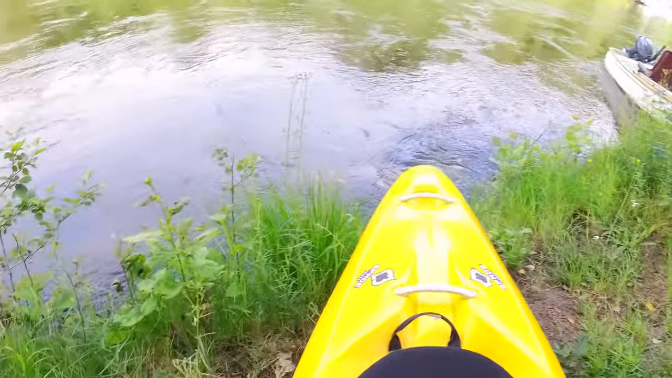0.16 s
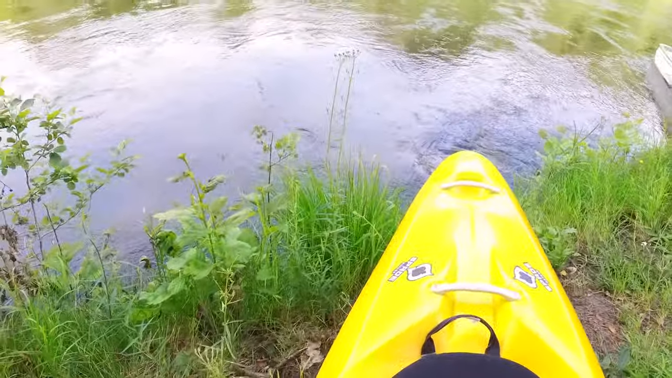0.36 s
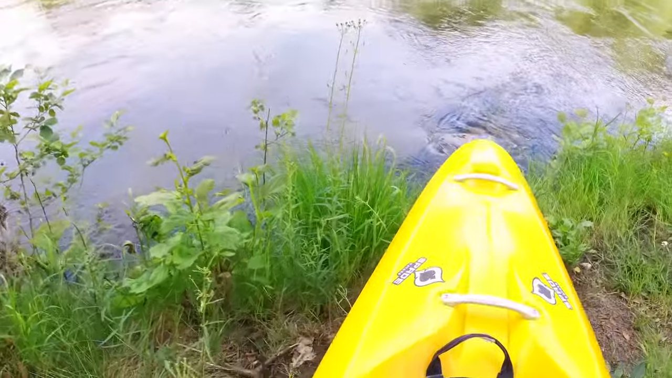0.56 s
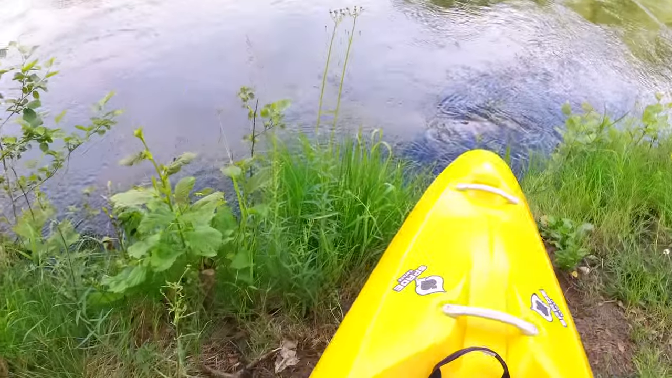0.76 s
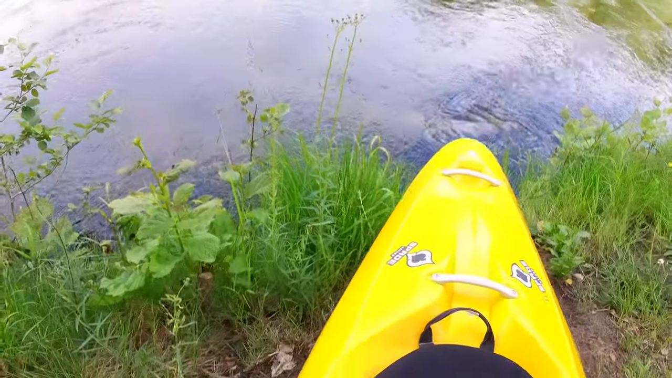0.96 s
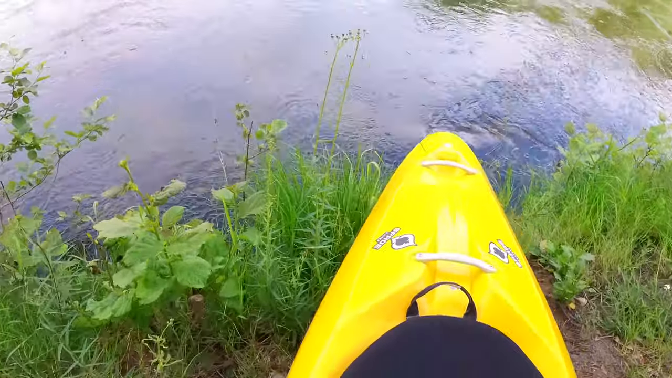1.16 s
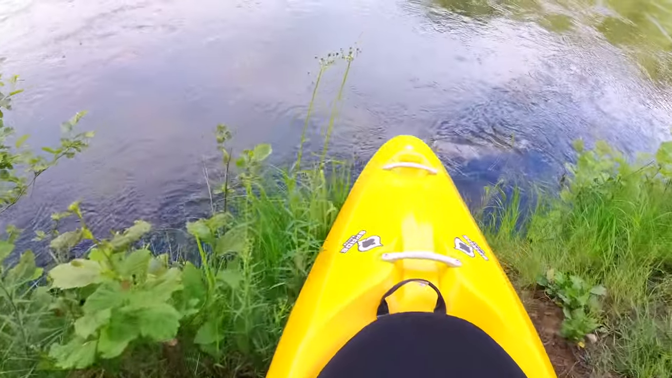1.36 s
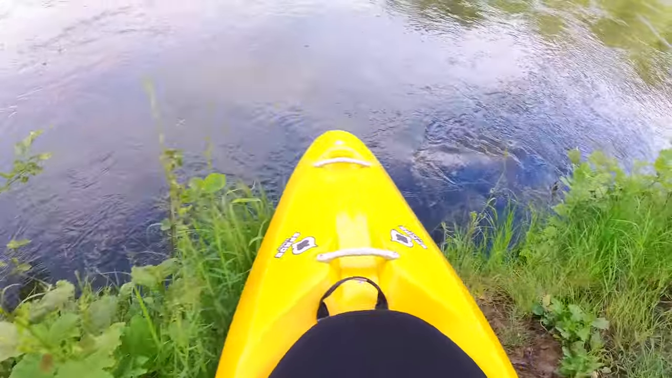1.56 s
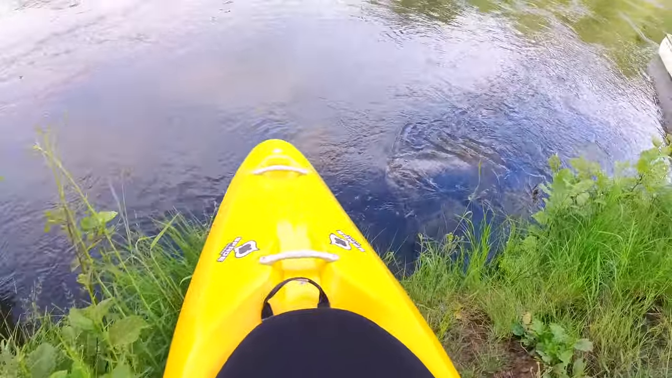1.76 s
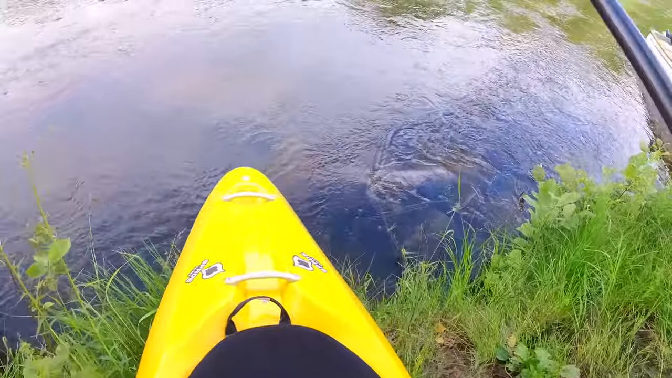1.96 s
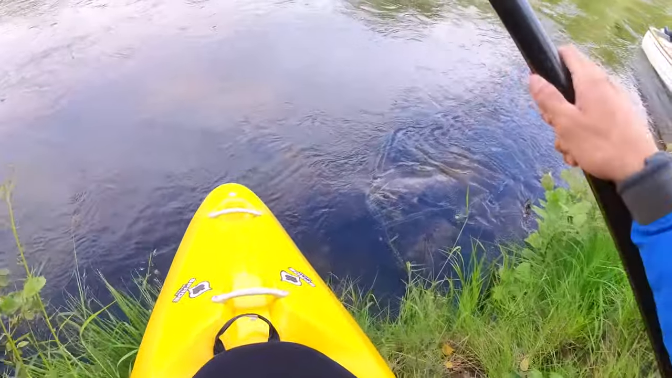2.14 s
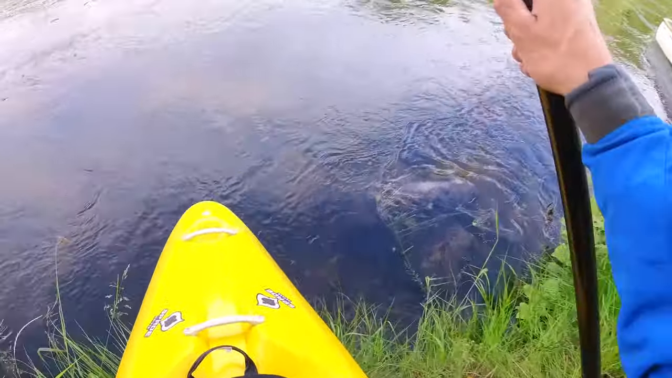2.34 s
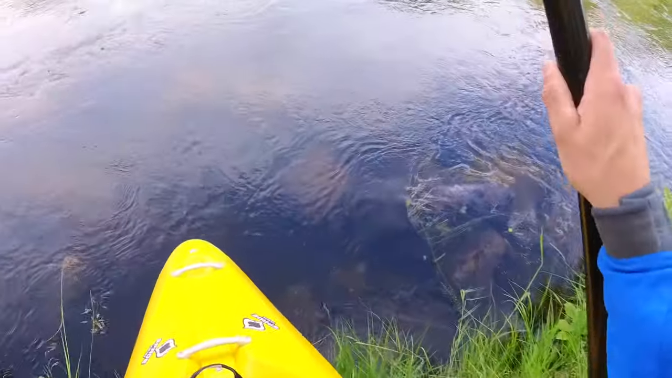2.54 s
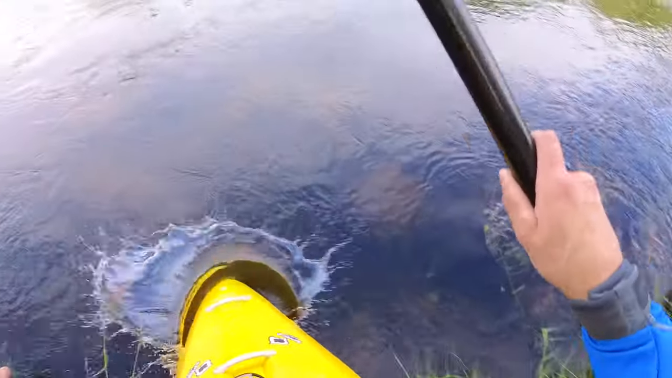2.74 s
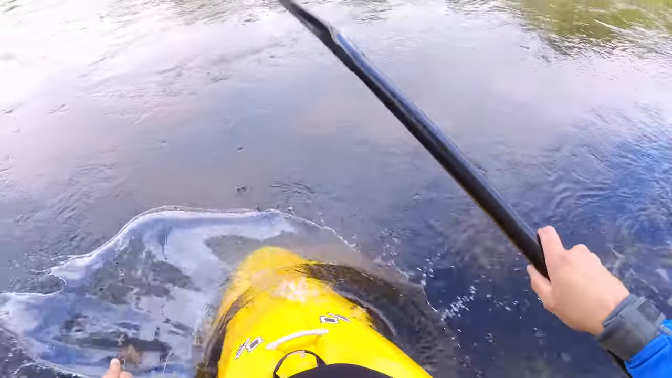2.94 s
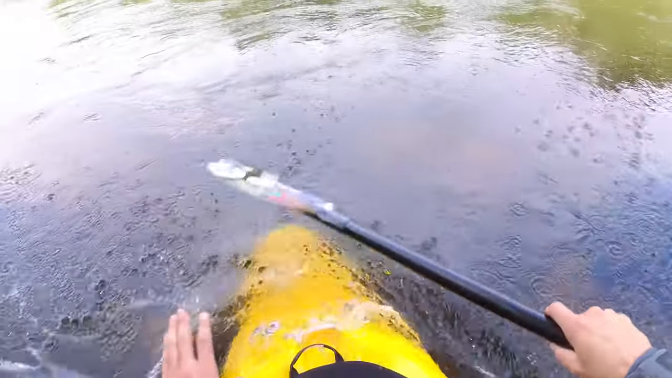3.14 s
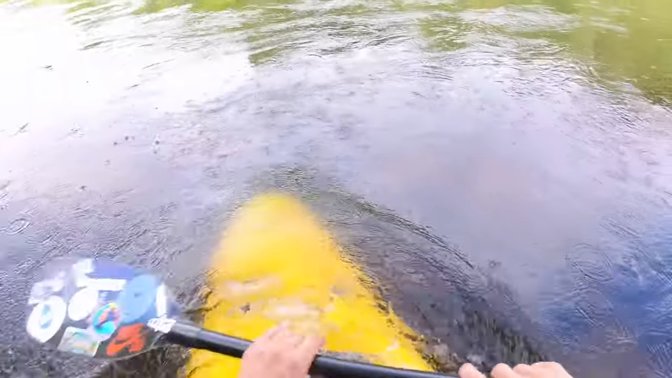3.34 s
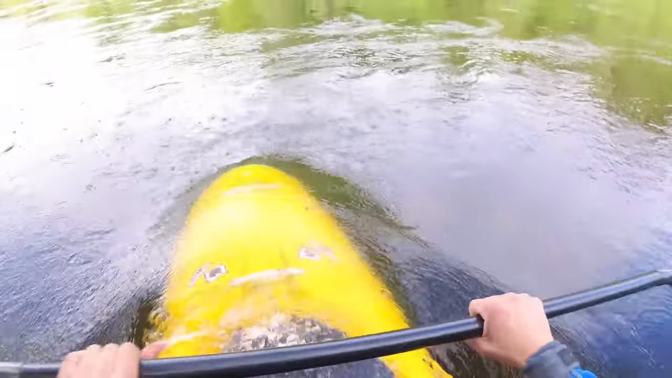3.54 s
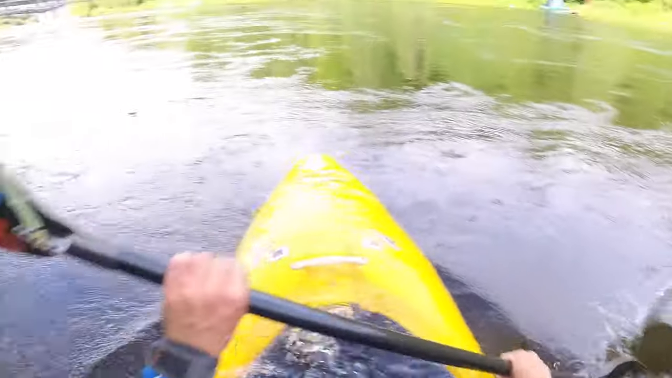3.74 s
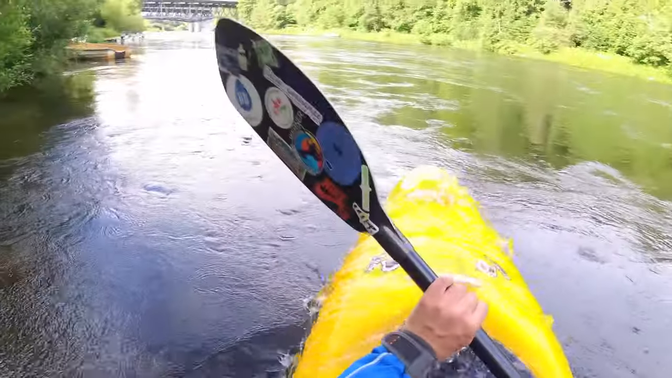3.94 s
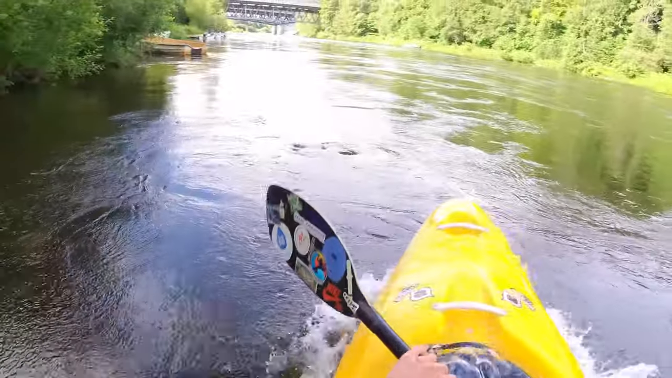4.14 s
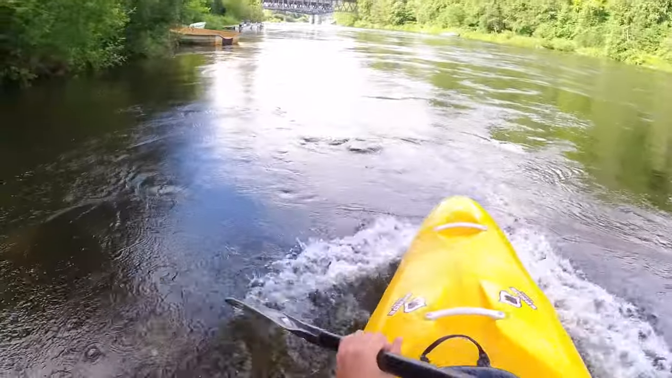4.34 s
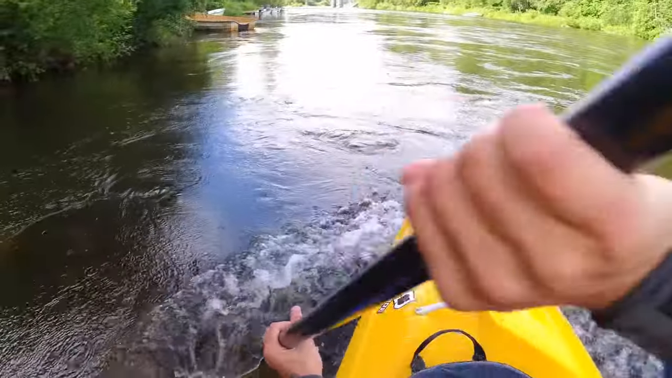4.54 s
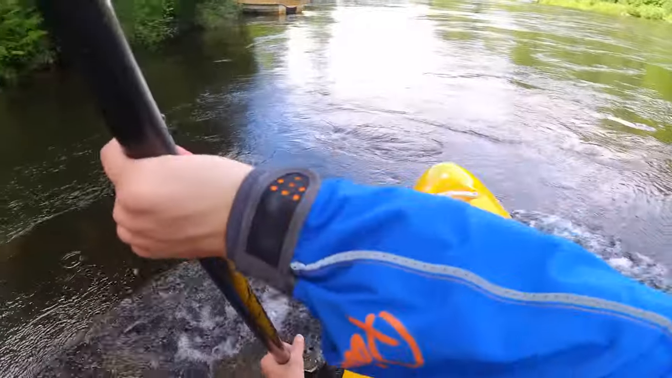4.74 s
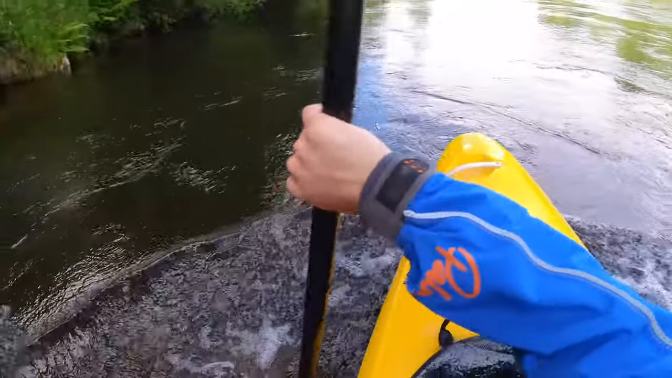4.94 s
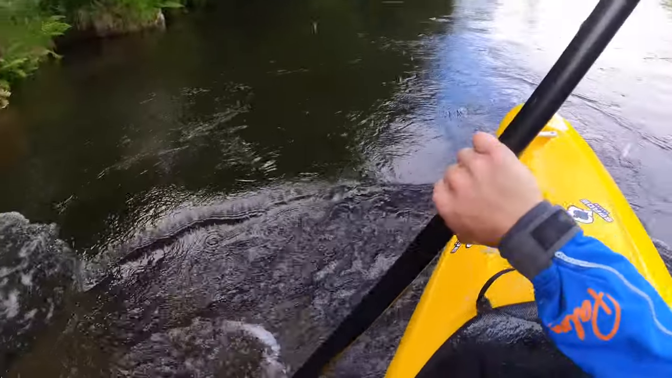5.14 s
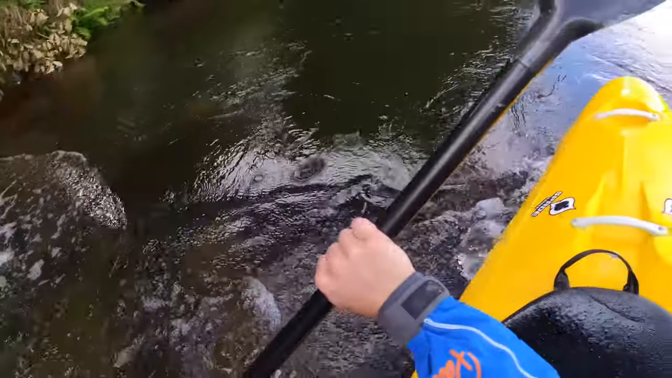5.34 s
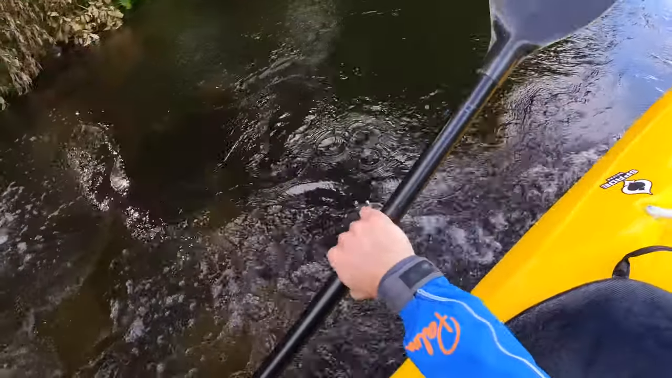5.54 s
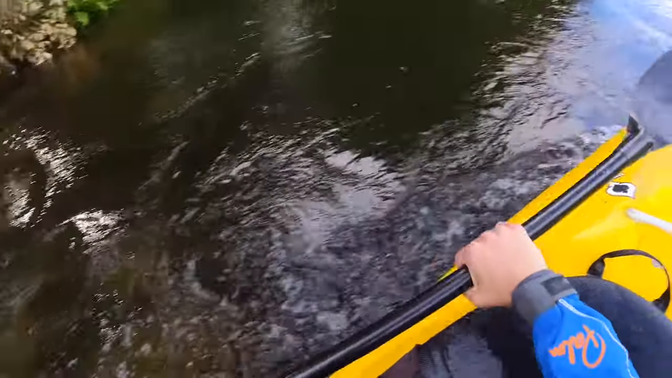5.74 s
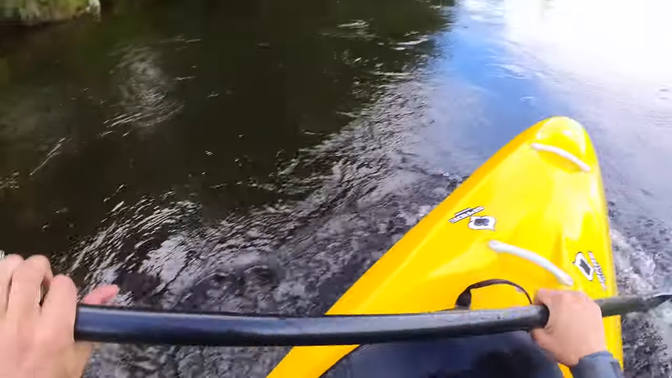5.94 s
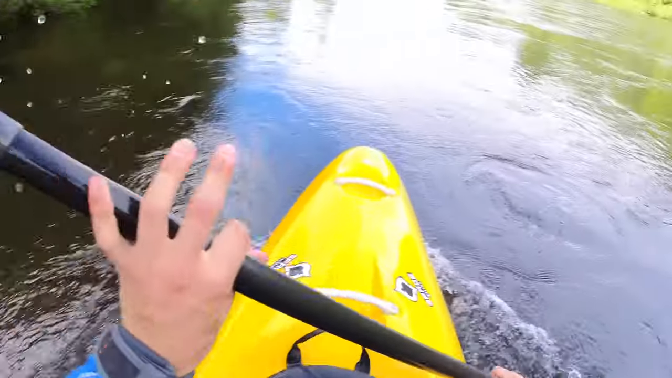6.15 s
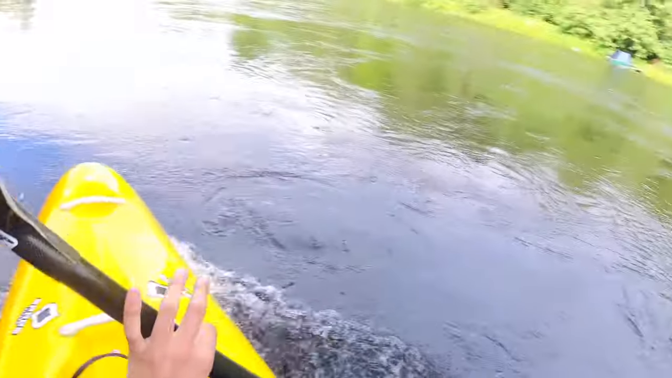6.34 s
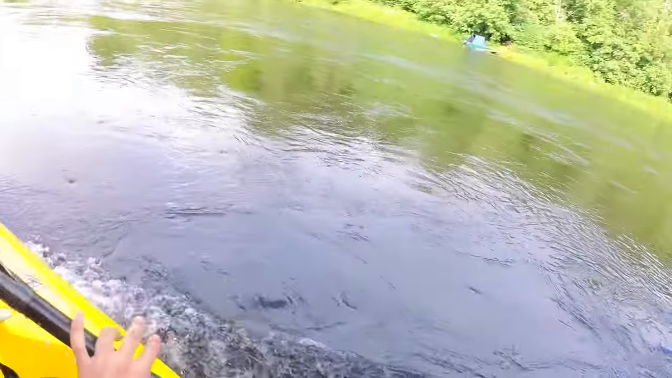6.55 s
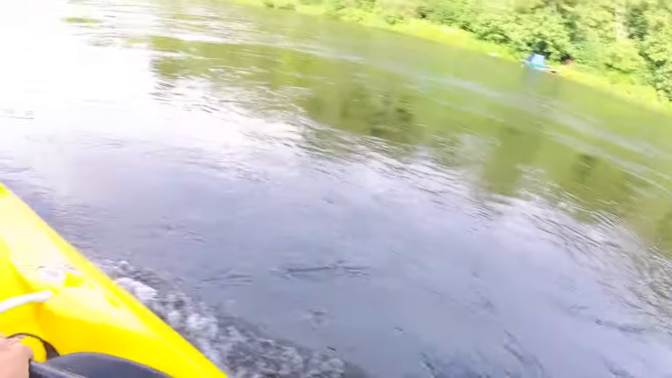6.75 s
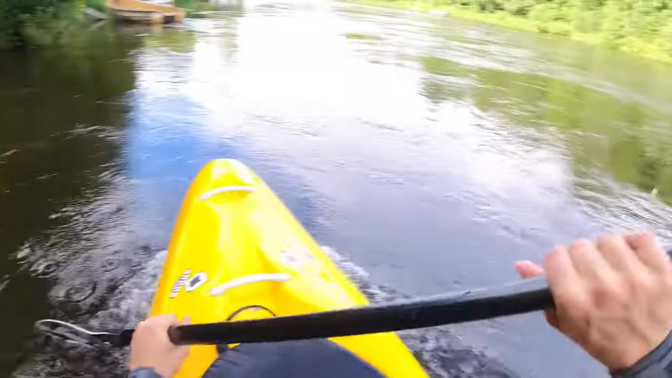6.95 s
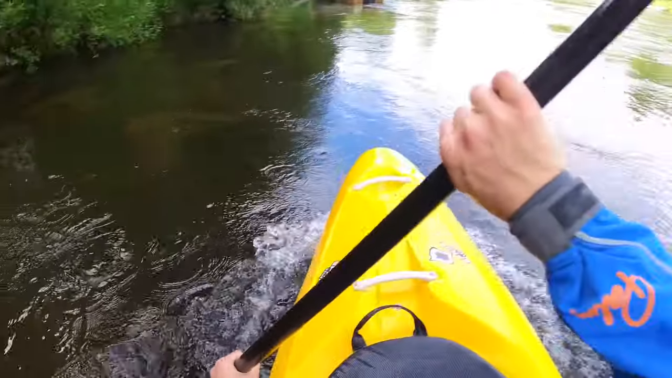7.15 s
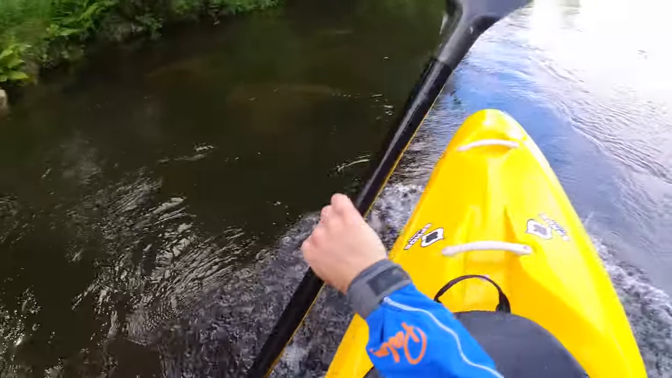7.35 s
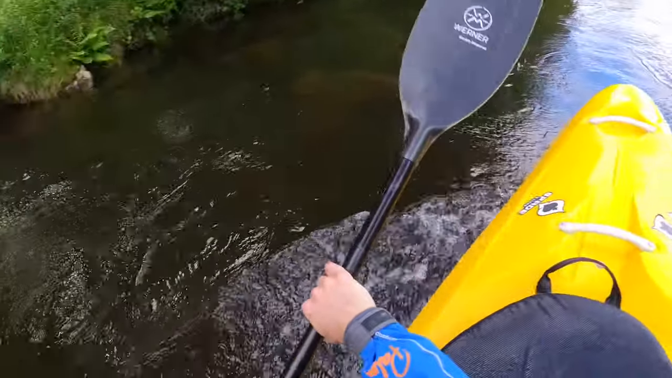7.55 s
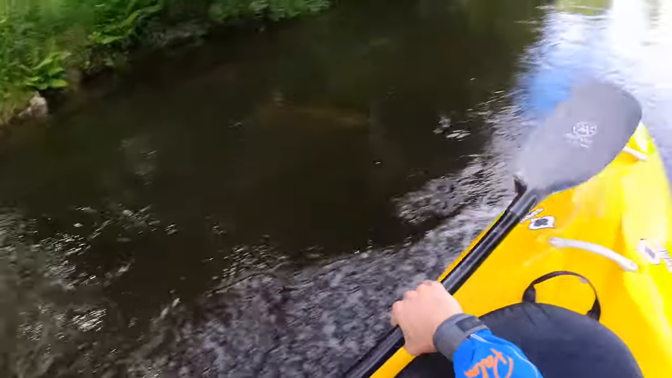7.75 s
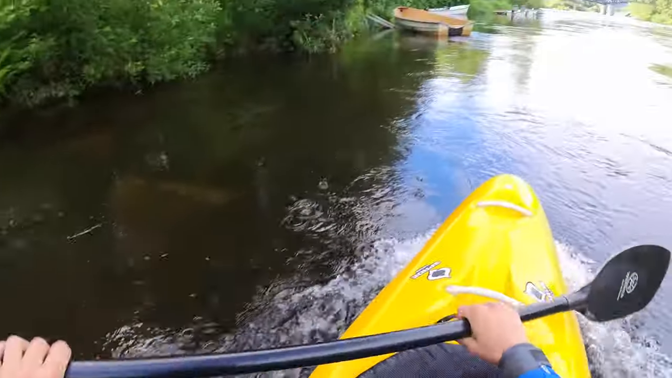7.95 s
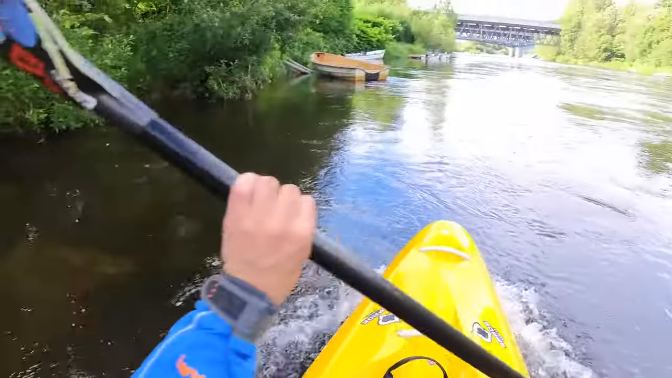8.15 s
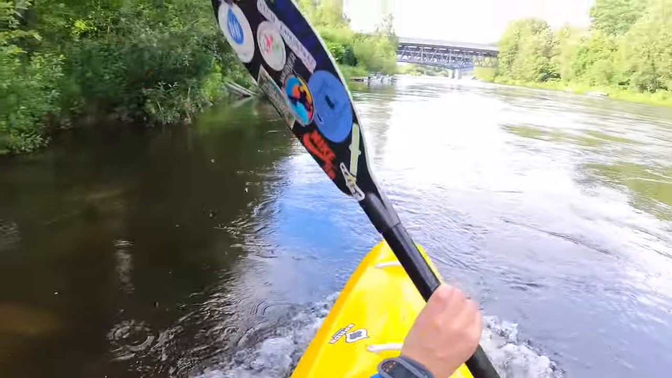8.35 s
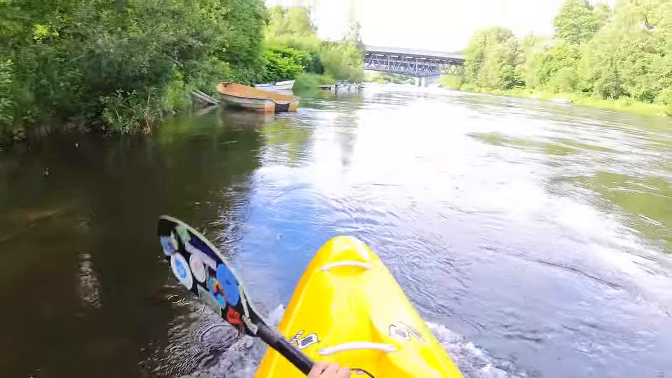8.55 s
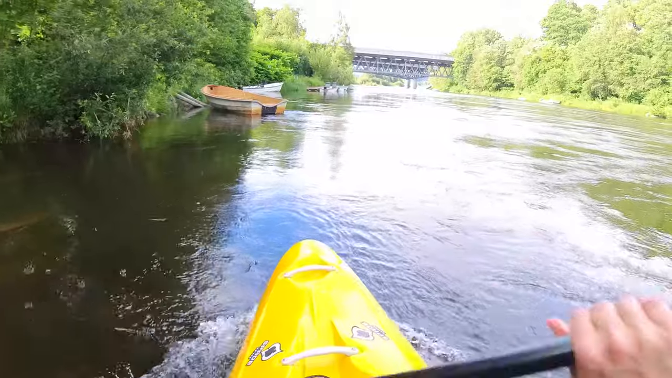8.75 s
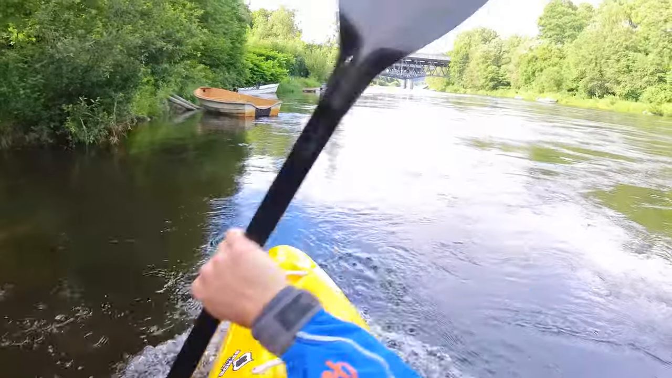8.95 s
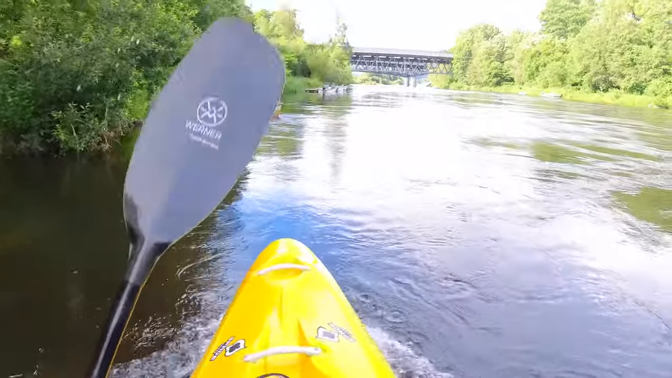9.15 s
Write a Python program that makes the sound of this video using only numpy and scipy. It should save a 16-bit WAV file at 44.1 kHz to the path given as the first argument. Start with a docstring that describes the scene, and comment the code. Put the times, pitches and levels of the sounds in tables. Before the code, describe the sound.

A hollow plastic kayak bumps and scrapes down a grassy bank, slaps into a river, then water gurgles and fizzes along it under paddle strokes.

```python
"""A plastic kayak hull booms and cracks as it bumps down a grassy bank into a river and is paddled off.
Struck modes make the hull and the paddle shaft; coloured noise makes brushing grass and sliding.
Damped sines, noise bursts and patchy noise make the water: gurgle, fizz, plops, slaps and gliding tones.
Far traffic hums and wind buffets the two microphone ports on a helmet, both from shaped noise."""
import sys
import numpy as np
from scipy import signal
from scipy.fft import rfft, irfft, next_fast_len
from scipy.io import wavfile
from scipy.ndimage import uniform_filter1d, map_coordinates

SR = 44100
rng = np.random.default_rng(int(sys.argv[2]) if len(sys.argv) > 2 else 0)


def wav_record(signal):
    """Record a signal, one row per channel, as 16-bit PCM in the file named by sys.argv[1]."""
    frames = np.transpose(np.atleast_2d(signal))
    bounded = np.clip(frames, -1, 1)
    # unit amplitude maps onto the largest positive 16-bit level
    quanta = np.round(bounded * 32767).astype(np.int16)
    wavfile.write(sys.argv[1], SR, quanta)


N = 405719


def amp(db):
    """Decibels to amplitude."""
    return 10 ** (np.asarray(db) / 20)


def unit(x):
    """Scale to an RMS of 1."""
    return x / np.sqrt(np.mean(x ** 2) + 1e-20)


def seconds(duration_s):
    """Sample times of a short sound."""
    return np.arange(int(duration_s * SR)) / SR


def along(points, hz, axis=1):
    """One column of a table read on a log-frequency axis."""
    table = np.transpose(points)
    return np.interp(np.log(hz + 1), np.log(table[0] + 1), table[axis])


def curves(rows):
    """One value per sample for each column after the time; -120 outside the table."""
    s, *columns = np.transpose(rows)
    return [np.interp(np.arange(N) / SR, s, column, left=-120, right=-120) for column in columns]


def surges(rows, rise_db_per_s, fall_db_per_s):
    """Each surge swells to its level, holds and dies away at steady rates in dB."""
    t = np.arange(N) / SR
    total = np.zeros(N)
    for s, held_s, db in rows:
        rise_db = rise_db_per_s * (t - s)
        fall_db = fall_db_per_s * (s + held_s - t)
        total += amp(db + np.minimum(0, np.minimum(rise_db, fall_db)))
    return total


def wobble(knots_per_s):
    """A smooth random curve through normal random knots."""
    knots = rng.standard_normal(int(N * knots_per_s / SR) + 4)
    return map_coordinates(knots, [np.arange(N) * knots_per_s / SR])


def filtered(x, response):
    """x times a response of frequency."""
    m = next_fast_len(N + SR // 2)
    return irfft(rfft(x, m) * response(np.fft.rfftfreq(m, 1 / SR)), m)[..., :N]


def patchy(depth_db):
    """Two noises that share patches of random gain in time and pitch."""
    z = signal.stft(rng.standard_normal((2, N)), nperseg=512)[2]
    field = uniform_filter1d(rng.standard_normal(z.shape[1:]), size=5, axis=0)
    field = uniform_filter1d(field, size=4, axis=1)
    return unit(signal.istft(z * amp(depth_db * unit(field)), nperseg=512)[1][:, :N])


def bubbles(count, hz, octaves, cycles, spread_db, rise, size):
    """Two streams of random damped sines; rise lifts their pitch as bubbles near the surface."""
    t = np.arange(size) / SR
    draw = rng.random((count, 3))  # time, loudness, stream
    pitch_hz = np.clip(hz * 2 ** (octaves * rng.standard_normal((count, 1))), 100, 9000)
    turns = pitch_hz * t
    waves = np.sin(2 * np.pi * turns * (1 + rise * turns / cycles / 2))
    waves *= np.exp(-turns / cycles) * (1 - np.exp(-2 * turns))
    waves *= amp(-spread_db * np.log(1.002 - draw[:, 1:2])) * np.hanning(2 * size)[size:]
    start = (draw[:, :1] * N).astype(int)
    where = start + np.arange(size) + (draw[:, 2:] < 0.5) * (N + size)
    streams = np.bincount(where.ravel(), waves.ravel(), 2 * (N + size)).reshape(2, -1)
    return unit(streams[:, :N])


# Left port against right. Each row: frequency in Hz, likeness 0-1, level in dB, lag in radians.
PORT_PAIR = [(100, 0.95, 1, .05), (640, 0.99, -0.5, 0.25), (1520, 0.73, 1, 0.57), (1850, 0.9, 1.5, 1.1),
             (3275, 0.22, 4, 2.76), (3460, 0.8, -0.5, 4.38), (4600, 0, -12, 3.3), (5730, 0, -5.5, 4.9),
             (6800, 0.04, -16.5, 0.51), (8750, 0.2, -11.5, 1.1)]


def around(pair, spectrum):
    """A broad source: coloured, alike at both ports in the bass and mostly unrelated in the treble."""
    def mid_side(hz):
        turn = np.arccos(np.clip(along(PORT_PAIR, hz), 0, 1)) / 2
        return amp(along(spectrum, hz)) * [np.cos(turn), np.sin(turn)]
    mid, side = filtered(pair, mid_side)
    return unit(np.array([mid + side, mid - side]))


def add(track, s, sound):
    """Mix a sound in at a time."""
    part = track[round(s * SR):][:len(sound)]
    part += sound[:len(part)]


def crack(t, t60_s, low_hz, high_hz=7500, rise_s=0.00015, order=1):
    """A short burst of band noise with a fast rise and an exponential decay."""
    band = signal.butter(order, [low_hz, max(high_hz, 1.3 * low_hz)], "band", fs=SR, output="sos")
    noise = unit(signal.sosfilt(band, rng.standard_normal(len(t))))
    return noise * amp(-60 * t / t60_s) * (1 - np.exp(-t / rise_s))


def ring(t, hz, db, t60_s, rough, rise=0, scatter_db=3.5):
    """A damped mode of random strength; its phase wanders, as plastic and water do not ring clean."""
    drift = rough * np.cumsum(rng.standard_normal(len(t))) / np.sqrt(SR * t60_s)
    turns = hz * t * (1 + rise * (t / t60_s - 0.3))
    envelope = amp(db + scatter_db * rng.standard_normal() - 60 * t / t60_s)
    return envelope * np.sin(2 * np.pi * turns + drift) * (1 - np.exp(-t * hz * 1.8))


# Traffic colour. Each row: frequency in Hz, density in dB per Hz.
TRAFFIC_SPECTRUM = [(110, -27), (180, -1), (540, -5), (754, -2), (929, -1.5), (1640, -13), (1920, -16),
                    (3120, -21), (4350, -25.5), (5000, -26), (6500, -68.5), (11000, -120)]


def traffic():
    """Far traffic hums across the water: band noise whose level drifts slowly."""
    return around(patchy(1.5), TRAFFIC_SPECTRUM) * amp(-40 + 0.7 * wobble(3))


# Hull sliding over the ground. Each row: time in seconds, level in dB.
DRAG_LEVEL = [(0.0, -47), (0.17, -43.5), (1.58, -48.5), (1.87, -39.5), (2.28, -47), (2.71, -47.5),
              (2.9, -27)]
# Sliding colour. Each row: frequency in Hz, density in dB per Hz.
RUMBLE_SPECTRUM = [(20, -25.5), (40, -8), (75, 0), (150, -1.5), (250, -21), (500, -49.5)]


def ground_rumble():
    """The hull slides over the ground: low noise that follows a level curve."""
    level_db, = curves(DRAG_LEVEL)
    return around(patchy(0.99), RUMBLE_SPECTRUM) * amp(level_db)


# Tufts brushing past. Each row: start in seconds, hold in seconds, level in dB.
GRASS_TUFTS = [(0.26, 0.011, -42), (0.45, 0.015, -72), (0.68, 0.056, -44.5), (1.02, 0.082, -40),
               (1.28, 0.034, -40), (1.62, 0.041, -42), (1.84, 0.012, -42.5), (2.2, 0.18, -39),
               (2.52, 0.035, -44.5), (2.78, 0.39, -39)]
# Grass colour. Each row: frequency in Hz, density in dB per Hz.
STEM_SPECTRUM = [(500, -2.5), (1500, -6), (3000, -10), (5000, -9), (9000, -4)]
GRASS_RISE_DB_PER_S, GRASS_FALL_DB_PER_S, GRASS_BED_DB = 90, 91, -56.5


def grass():
    """Grass brushes the hull: noise and tiny crackles swell with each tuft over a faint bed."""
    brush = surges(GRASS_TUFTS, GRASS_RISE_DB_PER_S, GRASS_FALL_DB_PER_S) + amp(GRASS_BED_DB)
    crackle = bubbles(count=6000, hz=4370, octaves=0.66, cycles=3.4, spread_db=0.5, rise=0, size=100)
    return around(patchy(3.7) + amp(-10) * crackle, STEM_SPECTRUM) * brush * amp(3.6 * wobble(13))


# Bumps and a hard slap of water.
# Each row: time in seconds, level in dB, strongest deep pitch in Hz, deep modes in dB, hardness in dB.
HULL_BLOWS = [(0.1756, -9.5, 103, -6.5, 2), (0.1795, -7, 105, 5, 2), (0.198, -11.5, 98.4, -1.5, -4),
              (0.957, -20.5, 98, 7, -9), (1.733, -4.5, 119, -2.5, -1.5), (1.815, -4.5, 143, -4.5, 3.5),
              (1.8218, -10, 143.5, -3.5, -3), (1.897, -30.5, 121, 9, -10), (2.711, -24.5, 124, -1, 1),
              (2.7329, -7, 127, 6, -2), (2.756, -10, 108.4, 1.5, -17), (2.785, -24, 91.4, 14.5, -18),
              (2.935, -10, 121.6, -4, -4), (2.945, -10, 120, -9, -0.5), (2.958, -21, 101.3, 8.5, 4)]
# Hull modes. Each row: frequency in Hz, level in dB, t60 in seconds.
HULL_MODES = [(57, -4, 0.21), (83.8, 1.5, 0.19), (117, 3, 0.13), (143.8, 5.5, 0.13), (231.6, 2, 0.11),
              (286, 1.5, 0.093), (358.5, 0.5, 0.085), (472, -4, 0.03), (597, 3.5, 0.052), (726, 2.5, 0.049),
              (845, 0.5, 0.065), (1008, -3.5, 0.071), (1210, 2, 0.013), (1450, -3.5, 0.028),
              (1867, -2.5, 0.024), (2356, -4, 0.019)]
CRACK_DB, CRACK_DB_PER_HARDNESS_DB = -5, 0.91
# the long hull takes a moment to boom; deep modes weaken away from the struck one
BOOM_LAG_S, BOOM_DB_PER_OCTAVE = 0.006, 15


def hull():
    """Bumps and a hard slap of water ring the hollow hull; hardness lifts the modes above 500 Hz and the crack."""
    out, t = np.zeros(N), seconds(1 / 3)
    for s, db, boom_hz, boom_db, hard_db in HULL_BLOWS:
        for hz, mode_db, t60_s in HULL_MODES:
            if hz < 200:
                off_db = BOOM_DB_PER_OCTAVE * abs(np.log2(hz / boom_hz))
                level_db = db + boom_db - off_db + mode_db - 6.5
                add(out, s + BOOM_LAG_S, ring(t, hz, level_db, t60_s, rough=1.3, scatter_db=4))
            else:
                level_db = db + mode_db - 8 + (hard_db - 7) * (hz > 500)
                add(out, s, ring(t, hz, level_db, t60_s, rough=3.13, scatter_db=2.5))
        snap = crack(t, 0.0065, low_hz=900, high_hz=6000, rise_s=0.00045)
        add(out, s, amp(db + CRACK_DB + CRACK_DB_PER_HARDNESS_DB * hard_db) * snap)
    return out


# Stems, drops and one sharp hull crack.
# Each row: time in seconds, level in dB, band centre in Hz, t60 in seconds.
SHORT_TICKS = [(0.2496, -28, 2000, 0.02), (1.2765, -27.5, 3860, 0.017), (1.294, -29.5, 3640, 0.018),
               (2.1474, -26, 2870, 0.015), (2.173, -23.5, 2820, 0.013), (2.2336, -29, 2430, 0.032),
               (2.331, -23.5, 2570, 0.012), (2.502, -31.5, 4530, 0.051), (2.7328, -15.5, 1710, 0.0068),
               (2.857, -31, 3160, 0.013), (2.94, -20.5, 3120, 0.066), (2.952, -26.5, 5650, 0.086),
               (3.034, -31.5, 5100, 0.012), (3.086, -29, 5850, 0.087), (3.2605, -20.5, 2760, 0.0077),
               (3.336, -9, 3180, 0.0057), (3.3694, -14, 7560, .014), (3.2, -28, 5500, 0.021),
               (3.101, -25, 7300, 0.02), (2.878, -30, 3100, 0.014), (2.918, -21.5, 6600, 0.036),
               (3.84, -19.5, 3000, 0.017), (5.293, -26, 5550, 0.013), (5.324, -14.5, 5650, 0.011),
               (5.55, -17.5, 6150, 0.012), (5.798, -21.5, 5240, 0.029), (6.141, -18.5, 5300, 0.018),
               (6.194, -16, 6100, 0.011), (7.391, -26.5, 3230, 0.015), (7.269, -23.5, 5400, 0.0098),
               (7.7196, -21, 5100, 0.01), (8.771, -17, 5600, 0.0063), (8.1263, -20.5, 4540, 0.024),
               (8.2965, -22, 2650, 0.012), (9.0705, -20.5, 2860, 0.01)]
TICK_BODY_DB = -12.5


def ticks():
    """Stems, drops and a sharp hull crack tick: a short noise burst over a duller, longer one."""
    out, t = np.zeros(N), seconds(1 / 5)
    for s, db, hz, t60_s in SHORT_TICKS:
        tick = crack(t, t60_s, hz / 1.24, hz * 1.64, order=2)
        body = crack(t, 2 * t60_s, low_hz=800, high_hz=2200)
        add(out, s, amp(db) * (tick + amp(TICK_BODY_DB) * body))
    return out


# Large bubbles. Each row: time in seconds, level in dB, pitch in Hz.
BUBBLE_PLOPS = [(2.2313, -25.5, 1220), (3.2238, -20, 2100), (3.262, -17, 834), (3.347, -17.5, 342),
                (3.378, -19.5, 974), (2.938, -18, 1666), (3.1267, -25.5, 2550), (3.494, -25, 666),
                (3.713, -14.5, 830), (3.73, -10, 360), (3.786, -10, 757), (3.749, -20, 1700),
                (3.838, -18, 2120), (3.887, -7.5, 910), (4.039, -8.5, 274), (5.386, -17.5, 898),
                (5.423, -16, 1120), (5.467, -21.5, 1820), (5.73, -11, 324), (5.751, -22, 493),
                (5.826, -11, 268), (5.874, -10.5, 500), (5.708, -13, 790), (5.709, -14, 1564),
                (5.886, -17, 308), (5.988, -15, 664), (6.452, -18, 359), (6.591, -14, 2070),
                (7.408, -15.5, 455), (7.815, -17.5, 1094), (8.399, -18, 810), (8.577, -13, 504),
                (8.69, -20.5, 326), (8.701, -18.5, 1770), (8.915, -13.5, 1115), (7.94, -18, 784),
                (8.91, -23.5, 285), (9.071, -17, 642), (9.091, -17.5, 807)]
PLOP_T60_AT_500_HZ_S, PLOP_T60_POWER = 0.05, 0.71  # smaller bubbles die sooner


def plops():
    """Single large bubbles: damped tones that rise in pitch."""
    out, t = np.zeros(N), seconds(1 / 5)
    for s, db, hz in BUBBLE_PLOPS:
        t60_s = PLOP_T60_AT_500_HZ_S * (hz / 500) ** -PLOP_T60_POWER
        add(out, s, ring(t, hz, db, t60_s, rough=2, rise=0.19, scatter_db=0))
    return out


# Flow along the hull. Each row: time in seconds, gurgle level in dB.
WASH_LEVEL = [(2.6, -56), (3.1, -45), (3.36, -36), (3.58, -44), (3.8, -27), (4.02, -21.5), (4.2, -22),
              (4.42, -23.5), (4.6, -28), (5.06, -30.5), (5.4, -29), (5.66, -36.5), (5.74, -29.5),
              (5.9, -32), (6.31, -36), (6.63, -34.5), (7.1, -37.5), (7.45, -36), (7.7, -32), (7.95, -31.5),
              (8.35, -32), (8.65, -38), (8.95, -32), (9.1, -43), (9.2, -53)]
# White water from dive and strokes. Each row: start in seconds, hold in seconds, fizz level in dB.
FOAM_SURGES = [(3.08, 0.04, -43.5), (3.35, 0.016, -33), (4.06, 0.095, -23.5), (4.33, 0.14, -24.5),
               (5.35, 0.078, -42.5), (5.62, 0.19, -27), (6.12, 0.027, -36), (6.5, 0.17, -32.5),
               (7.1, 0.23, -34), (7.9, 0.26, -30.5), (8.45, 0.13, -34), (9.1, 0.028, -29)]
# Gurgle colour. Each row: frequency in Hz, density in dB per Hz.
GURGLE_SPECTRUM = [(80, -14), (200, 0.5), (400, 3), (900, 2), (1500, -4.5), (2500, -8.5), (5000, -16)]
# Fizz colour. Each row: frequency in Hz, density in dB per Hz.
FIZZ_SPECTRUM = [(400, -7.5), (1200, 2.5), (2000, 0), (3500, -4), (5500, -3.5), (9000, 1.5)]
FOAM_RISE_DB_PER_S, FOAM_FALL_DB_PER_S = 49.5, 50
FOAM_BED_DB = -5  # against the gurgle


def water():
    """The wash along the hull: noise carrying many mid-size bubbles, and a fizz of tiny ones."""
    gurgle_db, = curves(WASH_LEVEL)
    white = surges(FOAM_SURGES, FOAM_RISE_DB_PER_S, FOAM_FALL_DB_PER_S) + amp(gurgle_db + FOAM_BED_DB)
    slosh_db = wobble(13)
    glugs = bubbles(count=3500, hz=853, octaves=0.86, cycles=4.6, spread_db=0.5, rise=0.17, size=700)
    foam = bubbles(count=20000, hz=3954, octaves=0.776, cycles=7.4, spread_db=2, rise=0.3, size=240)
    gurgle = around(patchy(0.54) + amp(-12.5) * glugs, GURGLE_SPECTRUM)
    fizz = around(patchy(3) + amp(-6.5) * foam, FIZZ_SPECTRUM)
    return gurgle * amp(gurgle_db + 0.5 * slosh_db) + fizz * white * amp(slosh_db + 0.77 * wobble(30))


# Wind strength. Each row: time in seconds, level in dB.
WIND_LEVEL = [(2.82, -37), (3.01, -23), (3.33, -30.5), (3.5, -27.5), (3.8, -43.5), (4.04, -30),
              (4.7, -27.5), (5.66, -42.5), (5.73, -36), (6.74, -38), (7.0, -51), (7.13, -63), (7.24, -32),
              (7.62, -41), (8.05, -37.5), (8.22, -56), (8.38, -38.5), (8.99, -32.5), (9.2, -27.5)]
# Lean of the wind as the head turns. Each row: time in seconds, left over right in dB.
WIND_LEAN = [(2.8, 0.5), (4.2, 5), (4.7, 12.5), (5.4, -11), (6.6, 14), (7.6, -6), (8.4, -1), (9.2, 11)]
# Buffet colour. Each row: frequency in Hz, density in dB per Hz.
BUFFET_SPECTRUM = [(15, -28), (35, -10), (60, -8), (120, -7.5), (200, -16.5), (400, -28), (1000, -56.5)]


def wind():
    """Lumpy low noise, partly shared by the ports; the windward port changes as the head turns."""
    (level_db,), (lean_db,) = curves(WIND_LEVEL), curves(WIND_LEAN)
    own_db = np.array([wobble(14), wobble(14)])
    lumps = amp(3.5 * own_db + 2.9 * wobble(9.3))
    noises = rng.standard_normal((3, N))
    left, right, common = filtered(noises, lambda hz: amp(along(BUFFET_SPECTRUM, hz)))
    buffets = unit(lumps * (np.array([left, right]) + 0.82 * common))
    return buffets * amp(level_db + np.clip([lean_db, -lean_db], -20, 20) / 2)


# Water on the hull. Each row: time in seconds, level in dB, pitch in Hz.
WATER_SLAPS = [(2.992, -12.5, 86), (3.026, -9, 106.5), (3.173, -9, 123.7), (3.191, -8, 84.5),
               (3.43, -32, 126), (4.767, -11.5, 77), (5.451, -22.5, 196), (5.997, -15, 98),
               (6.731, -14, 111.4), (7.259, -19, 134.5), (7.302, -22, 73), (8.782, -14.5, 142),
               (8.983, -6.5, 90.5)]


def slaps():
    """Water slaps the hull: dull, low damped tones."""
    out, t = np.zeros(N), seconds(1 / 5)
    for s, db, hz in WATER_SLAPS:
        add(out, s, ring(t, hz, db, t60_s=0.064, rough=0.94, scatter_db=2))
    return out


# Swarms of big bubbles from dive and strokes. Each row: start in seconds, hold in seconds, level in dB.
CHURN_SURGES = [(3.36, 0.041, -34), (3.5, 0.15, -36), (3.72, 0.019, -31.5), (3.88, 0.035, -23.5),
                (4.02, 0.12, -24), (4.3, 0.12, -29), (5.73, 0.018, -28), (5.86, 0.041, -30.5),
                (9.03, 0.079, -30)]
CHURN_RISE_DB_PER_S, CHURN_FALL_DB_PER_S = 200, 106


def churn():
    """Trapped air breaks up into dense, overlapping bubbles, summed to one stream."""
    swarm = bubbles(count=6000, hz=580, octaves=0.8, cycles=3, spread_db=1.6, rise=0.25, size=900)
    return unit(swarm.sum(0)) * surges(CHURN_SURGES, CHURN_RISE_DB_PER_S, CHURN_FALL_DB_PER_S)


# Air pockets closing behind blade and hull.
# Each row: start in seconds, length in seconds, level in dB, first pitch in Hz, last pitch in Hz.
POCKET_GLIDES = [(3.798, 0.0352, -23, 492, 820), (3.857, .06, -19, 315.6, 485),
                 (5.938, 0.036, -23.5, 390, 443), (8.525, .038, -21.5, 197, 330),
                 (8.611, 0.013, -24.5, 590, 795), (9.018, 0.025, -21, 748, 613)]


def glides():
    """Each air pocket sings an unsteady gliding tone that swells until it closes, then dies fast."""
    out = np.zeros(N)
    for s, length_s, db, from_hz, to_hz in POCKET_GLIDES:
        u = np.arange(round(1.3 * length_s * SR)) / (length_s * SR)  # 1 where the pocket closes
        jitter = 0.37 * uniform_filter1d(rng.standard_normal(len(u)), size=200)
        pitch_hz = from_hz * (to_hz / from_hz) ** u * (1 + jitter)
        swell_db = np.minimum(9 * (u - 1), 120 * (1 - u))
        tone = np.sin(2 * np.pi * np.cumsum(pitch_hz) / SR)
        add(out, s, amp(db + swell_db) * (1 - np.exp(-8 * u)) * tone)
    return out


# Paddle shaft on the hull. Each row: time in seconds, level in dB, crack in dB against it.
SHAFT_RAPS = [(5.0175, -12, -28), (5.021, -5, -22), (5.032, -18, -34), (7.362, -14, -18)]
# Shaft modes. Each row: frequency in Hz, level in dB, t60 in seconds.
SHAFT_MODES = [(372, 1, 0.098), (770, 1, 0.064), (1003, 13.5, 0.019), (1416, -4.5, 0.08),
               (2023, -10, 0.075), (2700, -2.5, 0.016), (3440, -19, 0.012)]


def paddle():
    """The paddle shaft raps the hull: short rough modes and a noise crack."""
    out, t = np.zeros(N), seconds(1 / 3)
    for s, db, crack_db in SHAFT_RAPS:
        knock = sum(ring(t, hz, mode_db, t60_s, rough=3.9) for hz, mode_db, t60_s in SHAFT_MODES)
        snap = crack(t, 0.0094, low_hz=700, high_hz=4000)
        add(out, s, amp(db - 9) * knock + amp(db + crack_db + 6) * snap)
    return out


def scattered(x):
    """Near sounds reach each port also by a short, separate scatter off deck, body and helmet."""
    t = seconds(1 / 12)
    tails = np.array([crack(t, 0.04, low_hz=1100), crack(t, 0.04, low_hz=1100)])
    tails /= np.linalg.norm(tails[0])
    return x + amp(-10) * signal.fftconvolve(x[None], tails, axes=1)[:, :N]


def scene():
    """Near sounds with their scatter, plus the broad sources."""
    near = hull() + ticks() + plops() + slaps() + churn() + glides() + paddle()
    return traffic() + ground_rumble() + grass() + scattered(near) + water() + wind()


# Microphone response. Each row: frequency in Hz, gain in dB.
MICROPHONE_RESPONSE = [(20, -14.5), (50, 0.5), (5500, 0.5), (6300, -2.5), (7000, -8), (7800, -17),
                       (8600, -24.5), (9000, -24)]
TOP_HZ = 8775


def record(dry):
    """The left port lags and is duller; the microphone falls off steeply above its band."""
    def ports(hz):
        band = amp(along(MICROPHONE_RESPONSE, hz)) / (1 + (hz / TOP_HZ) ** 60)
        left = amp(along(PORT_PAIR, hz, axis=2)) * np.exp(-1j * along(PORT_PAIR, hz, axis=3))
        return band * np.array([left, np.ones_like(hz)])
    dry = dry / (1 + np.abs(dry / 0.8) ** 4) ** (1 / 4)  # the loudest blows saturate softly
    return filtered(dry, ports)


dry = scene()
out = record(dry)
wav_record(out)
```